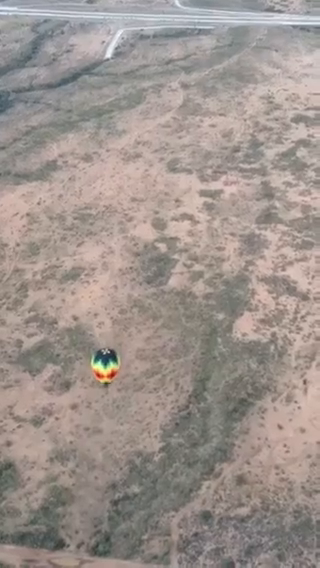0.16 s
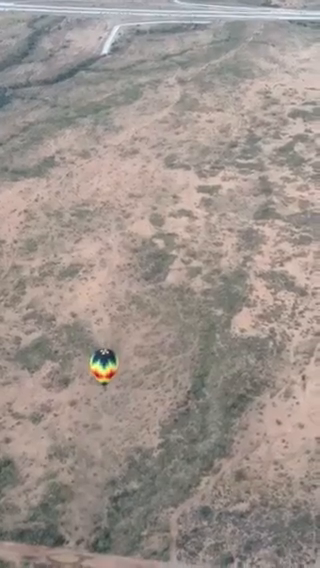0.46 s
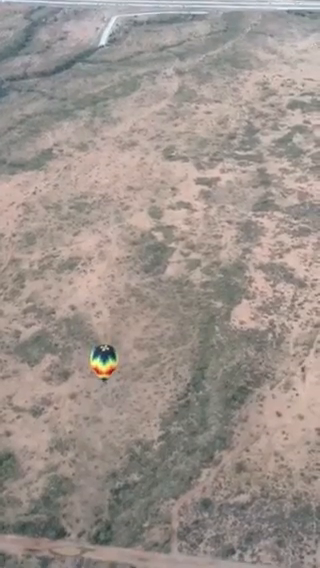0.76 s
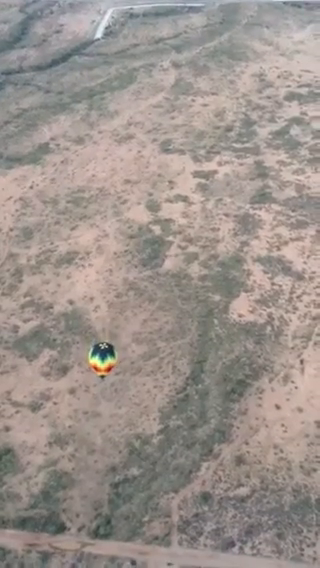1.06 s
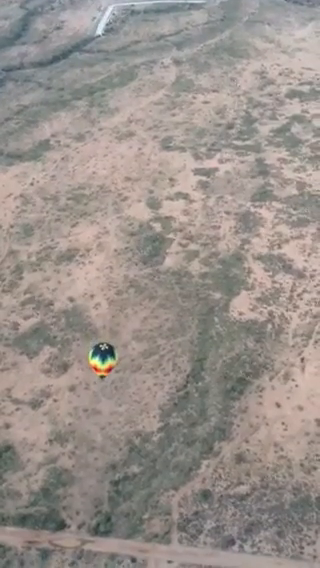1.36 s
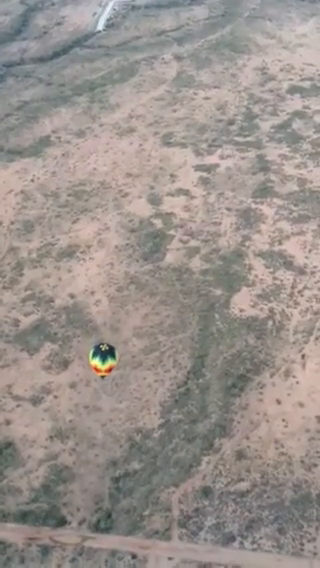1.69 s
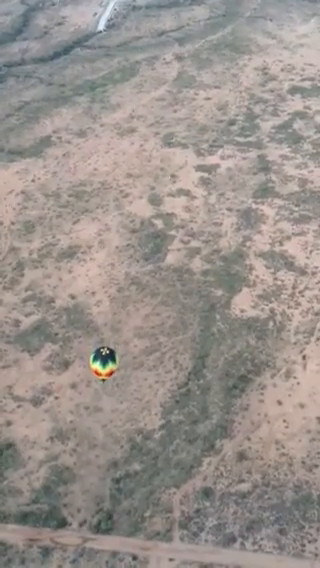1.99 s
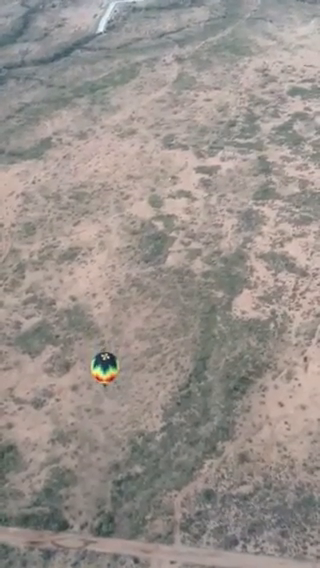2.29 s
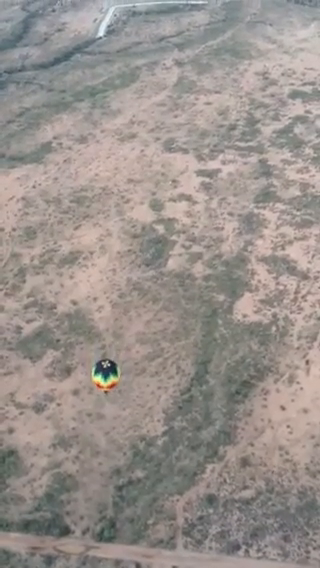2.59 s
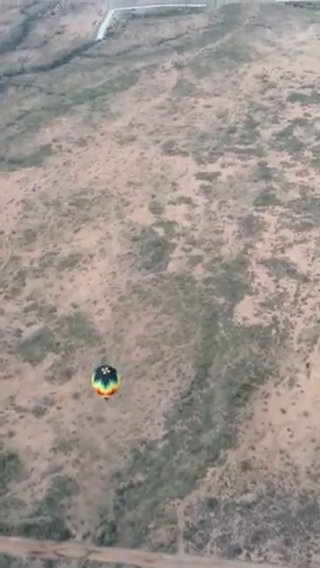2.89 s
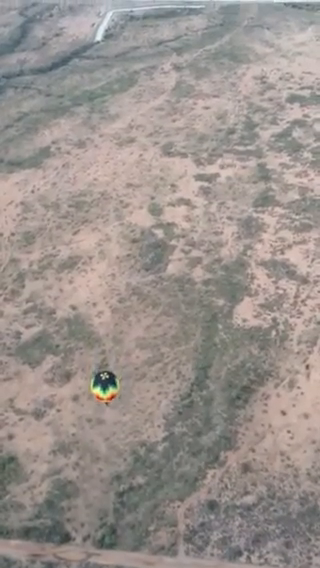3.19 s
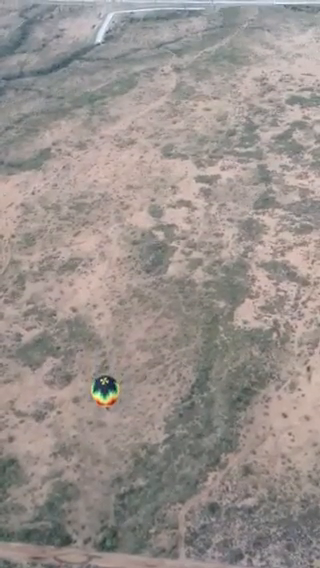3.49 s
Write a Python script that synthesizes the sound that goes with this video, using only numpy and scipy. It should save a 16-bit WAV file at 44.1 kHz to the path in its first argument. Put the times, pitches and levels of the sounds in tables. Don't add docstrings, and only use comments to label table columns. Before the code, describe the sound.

A hot air balloon's propane burner, close to a phone microphone in open air. A faint pilot flame murmurs until 0.2 s, when gas hisses and ignites with a deep whump. A loud, lumpy low roar with bright rushing hiss holds, surging and dipping slightly, notably near 0.8 s. Hiss fades from 2.9 s; flame breaks off around 3.3 s. A tiny metallic tick at 3.44 s, then quiet murmur and faint distant drone.

```python
import sys
import numpy as np
from scipy import signal
from scipy.fft import rfft, irfft
from scipy.io import wavfile
from scipy.ndimage import uniform_filter1d

SR = 44100
rng = np.random.default_rng(int(sys.argv[2]) if len(sys.argv) > 2 else 0)


def dump(signal):
    limited = np.clip(np.atleast_2d(signal).T, -1, 1)
    pcm = np.round(limited * 32767).astype(np.int16)
    wavfile.write(sys.argv[1], SR, pcm)


def volts(x):
    e = np.asarray(x, float) / 20
    return 10 ** e


N = 158760
T = np.arange(N) / SR

# pitch_hz, density_db
PILOT_MURMUR = [(50, -48), (111, -7.5), (270, -3), (362, -16), (570, -11), (900, -21), (1400, -37),
                (2800, -41)]
# pitch_hz, width_hz, level_db
PILOT_HISS = [(281, 12, -58), (550, 13, -70), (1820, 300, -69), (3420, 310, -67), (3790, 410, -64),
              (4700, 400, -85)]
# pitch_hz, density_db
AIR = [(1500, -2), (2800, -4), (5000, -2), (6500, -7), (7800, 0), (9000, -9), (11500, -5), (15300, -8)]
# time_s, jet_level_db
FLOW = [(.186, -95), (.19, -60), (.198, -35), (.235, -25.5), (.28, -18), (.36, -20.5), (1.5, -18.5),
        (2.3, -17.5), (2.7, -21), (2.886, -23.5), (2.894, -24.5), (3.17, -30), (3.28, -40.5), (3.35, -68),
        (3.39, -88)]
# pitch_hz, density_db
JET_EDGE = [(1500, -6), (2600, -5), (3200, -7.5), (3800, -2), (4400, 0), (5100, -3), (5700, -9), (6600, -6)]
# pitch_hz, density_db
JET_TOP = [(6600, -2.5), (8000, 4.5), (9500, 3), (11500, 4.5), (13500, 3.5), (15500, 0)]
# time_s, roar_level_db
FLAME = [(.192, -95), (.2, -32), (.225, -16.5), (.28, -16.5), (.305, -14), (.65, -14), (1.3, -15),
         (2.3, -16), (2.68, -13.5), (2.95, -14), (3.24, -17), (3.33, -29), (3.36, -41), (3.44, -49),
         (3.49, -62), (3.6, -60)]
# pitch_hz, density_db
ROAR = [(25, -63), (59, -37.5), (152, -3.5), (220, 1), (468, -11.5), (587, -11), (677, -18.5), (900, -17.5)]
# pitch_hz, density_db
BODY = [(500, -6), (800, -18), (1050, -1.5), (1300, 3), (1650, -8), (2300, -12), (3200, -11), (5000, -17.5)]
# start_s, level_db, pitch_hz, rise_s, t60_s
WHUMPS = [
    (0.196, -29, 297, .004, .04),
    (.204, -14, 433, 0.0056, .06),
    (0.204, -26, 797, 0.0028, 0.047),
    (0.2124, -1, 197, 0.0065, 0.038),
    (0.367, -8, 181, 0.01, 0.15),
    (0.81, -6, 225, 0.0077, .03),
    (3.284, -8.5, 220, 0.0042, .04),
    (3.299, -20, 194, 0.0092, 0.17),
]
# start_s, gain_step_db, thump_level_db
SURGES = [
    (.217, 0, -32),
    (.375, -1.5, -41),
    (.5, -0.5, -42),
    (0.823, -4, -32),
    (1.182, -3, -45),
    (1.572, -2.5, -44),
    (1.87, -1, -48),
    (2.06, -2, -38),
    (2.346, -2.5, -40),
    (2.89, -2.5, -43),
]
# multiple, level_db
HUM = [(1, -69), (2, -57), (3, -61), (4, -68), (5, -70)]
# pitch_hz, level_db, t60_s
LEVER = [(2320, -63, .07), (3780, -61, .12), (4780, -66, .07), (5700, -61, .08), (7650, -60, .14),
         (8700, -63, .1), (10000, -60, .1), (11800, -61, .11), (14500, -62, .09)]
# pitch_hz, threshold_sigma
HOLES = [(2000, 2.8), (8000, 2.6), (11000, 2.3), (13000, 1.9), (15000, 1.5)]
# centre_s, low_hz, high_hz
WIDE = [(.975, 9600, 11200), (1.58, 13100, 15300), (1.905, 5700, 7000), (2.437, 4100, 5300),
        (2.437, 6900, 10500), (2.437, 13800, 15300), (2.46, 5200, 7700), (2.507, 9600, 11200),
        (2.507, 11700, 13200), (3.018, 6900, 8400), (3.065, 6300, 9100)]


def evened(x):
    return x / np.sqrt(np.mean(x ** 2) + 1e-20)


def read(points, hz):
    f, value = np.transpose(points)
    return np.interp(np.log(hz + 1), np.log(f + 1), value)


def curve(points):
    return np.interp(T, *np.transpose(points))


def octaves_above(hz, corner):
    return np.log2(np.maximum(hz / corner, 1))


def octaves_below(hz, corner):
    return np.log2(np.clip(corner / (hz + 1), 1, 9))


def wander(hz_low, hz_high):
    rates = np.geomspace(hz_low, hz_high, num=30)
    t = T[::64]
    sway = sum(np.sin(2 * np.pi * (f * t + p)) / f ** 0.59 for f, p in zip(rates, rng.random(30)))
    return evened(np.interp(T, t, sway))


def noise(colour_db, patchy_db, size=512):
    hz = np.fft.rfftfreq(size, 1 / SR)
    a, b, patches = rng.standard_normal((N * 4 // size + 5, len(hz), 3)).T
    patches = uniform_filter1d(patches, size=size // 64, axis=0)
    patches = evened(uniform_filter1d(patches, size=8192 // size, axis=1))
    z = (a + 1j * b) * volts(colour_db(hz)[:, None] + patchy_db * patches)
    return evened(signal.istft(z, nperseg=size, noverlap=size * 3 // 4)[1][:N])


def band(x, hz, width):
    f = np.fft.rfftfreq(len(x), 1 / SR)
    return irfft(rfft(x) * np.exp(-2 * ((f - hz) / width) ** 2), len(x))


def steps(recover_s):
    total = 0
    for s, db, _ in SURGES:
        onset = np.clip((T - s) / 0.0051, 0, 1)
        total = total + db * onset * np.exp(-np.maximum(T - s, 0) / recover_s)
    return total


def pilot():
    after = T > 2

    def murmur_colour(hz):
        return read(PILOT_MURMUR, hz) - 30 * octaves_below(hz, 50) - 12 * octaves_above(hz, 2800)

    murmur = noise(murmur_colour, patchy_db=1, size=2048)
    murmur_db = -51 - 8.5 * after * np.clip((3.64 - T) / .14, 0, 1)
    white = rng.standard_normal((len(PILOT_HISS), N))
    hiss = sum(volts(db) * evened(band(w, hz, width)) for w, (hz, width, db) in zip(white, PILOT_HISS))
    air = noise(lambda hz: read(AIR, hz) - 30 * (hz < 1000), patchy_db=2.5, size=1024)
    return murmur * volts(murmur_db) + hiss * volts(-6 * after) + air * volts(-66 - 0.5 * after)


def jet():
    def edge_colour(hz):
        return read(JET_EDGE, hz) - 40 * (hz < 1000) - 12 * octaves_above(hz, 6600)

    def top_colour(hz):
        return read(JET_TOP, hz) + 30 * np.log2(np.clip(hz / 6600, .01, 1))

    edge = noise(edge_colour, patchy_db=.8)
    top = noise(top_colour, patchy_db=0.77)
    sway_db = .5 * wander(2.976, 14)
    flow_db = curve(FLOW)
    edge_db = -26 + 0.7 * (flow_db + 20.5)
    return top * volts(flow_db + sway_db) + edge * volts(edge_db + sway_db)


def flame():
    lumps = wander(6, 40)

    def roar_colour(hz):
        return read(ROAR, hz) - 12 * octaves_below(hz, 25) - 38 * octaves_above(hz, 900)

    roar = noise(roar_colour, patchy_db=-0.37, size=4096)
    body = noise(lambda hz: read(BODY, hz) - 30 * (hz < 300), patchy_db=-0.26, size=1024)
    lull_db = 0.64 * steps(0.013)
    roar_db = curve(FLAME) + 1.7 * lumps + lull_db
    body_db = -11.5 + curve(FLAME) + 0.1 * (curve(FLOW) + 20)
    return roar * volts(roar_db) + body * volts(body_db + 1.8 * lumps + 1.1 * wander(3.7, 30))


def whump(s, db, hz, rise, t60):
    t = np.maximum(T - s, 0)
    pitch_hz = hz * (1 + 0.92 * np.exp(-t / 0.0028))
    turns = np.cumsum((t > 0) * pitch_hz) / SR
    swell = np.minimum(t / rise, 1) ** 2
    return swell * volts(db - 60 * np.maximum(t - rise, 0) / t60) * np.sin(2 * np.pi * turns)


def pockets():
    highpass = signal.butter(2, 90, "high", fs=SR, output="sos")
    return signal.sosfilt(highpass, sum(whump(*row) for row in WHUMPS))


def thumps():
    total = 0
    for s, _, db in SURGES:
        push = np.exp(-((T - s) / 0.0044) ** 2)
        total = total + volts(db) * push * np.cos(2 * np.pi * 35 * (T - s))
    return total


def hum():
    fade_in = np.clip((T - 3) / 0.043, 0, 1)
    phases = rng.random(len(HUM))
    return fade_in * sum(volts(db) * np.sin(2 * np.pi * (k * 148.3 * T + p)) for (k, db), p in zip(HUM, phases))


def valve():
    t = T - 3.439
    puff_level = np.clip(t / 0.0043, 0, 1) * volts(-54 - 60 * np.maximum(t, 0) / .13)
    puff = puff_level * evened(band(rng.standard_normal(N), 10000, 11000))
    u = np.maximum(T - 3.443, 0)
    ring = sum(volts(db - 60 * u / t60) * np.sin(2 * np.pi * hz * u) for hz, db, t60 in LEVER)
    return puff + np.minimum(u / 0.0018, 1) * ring


def holes(x):
    hz, _, z = signal.stft(x, SR, nperseg=1024)
    chance = uniform_filter1d(rng.standard_normal(z.shape), size=4, axis=0)
    chance = evened(uniform_filter1d(chance, size=3, axis=1))
    quiet = 10 * np.log10((abs(z) ** 2).sum(0) + 1e-12) < -45
    treble = np.clip(hz / 5000 - .5, 0, 1)[:, None]
    limit = read(HOLES, hz)[:, None] - .8 * quiet * treble
    keep = np.clip(.5 + 6 * (limit - chance), .02, 1)
    return signal.istft(z * np.where(hz[:, None] > 1500, keep, 1), SR, nperseg=1024)[1][:N]


def wide_bands(x):
    hz, spectrum = np.fft.rfftfreq(N, 1 / SR), rfft(x)
    side = 0
    for s, low, high in WIDE:
        burst = np.roll(irfft(spectrum * (hz > low) * (hz < high), N), 2000)
        side = side + burst * np.cos(np.pi * np.clip((T - s) / 0.035, -.5, .5))
    return volts(-2) * side


def scene():
    mono = pilot() + jet() + flame() + pockets() + thumps() + hum() + valve()
    return np.tile(mono, (2, 1))


def roll_off(x):
    return signal.sosfilt(signal.butter(12, 15940, fs=SR, output="sos"), x)


def record(dry):
    x = dry[0] * volts(steps(0.14))
    x = x / (1 + abs(x / .7) ** 6) ** (1 / 6)
    x = holes(x)
    lowpass = signal.firwin(1601, 15340, window=("kaiser", 9), fs=SR)
    x = signal.oaconvolve(x, lowpass, "same")
    side = wide_bands(x)
    return roll_off(np.array([x + side, x - side]))


dry = scene()
out = record(dry)
dump(out)
```